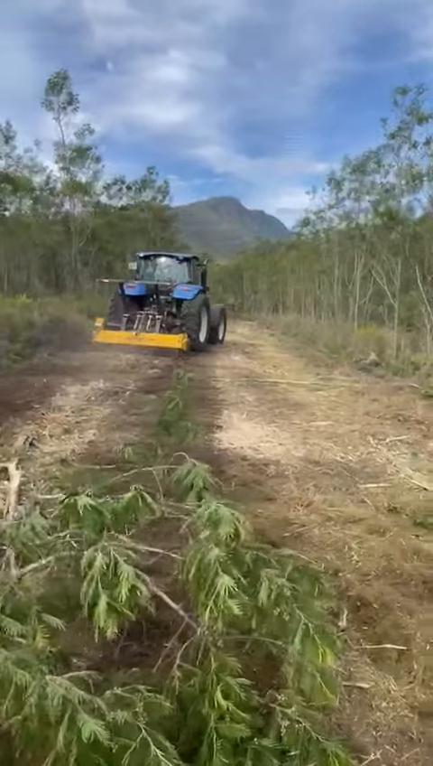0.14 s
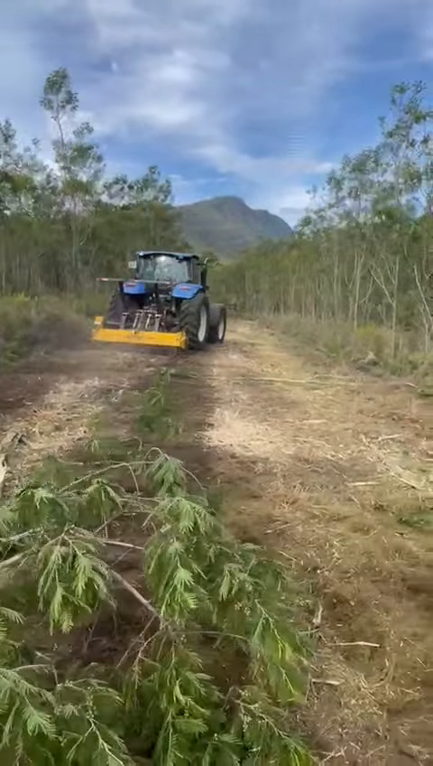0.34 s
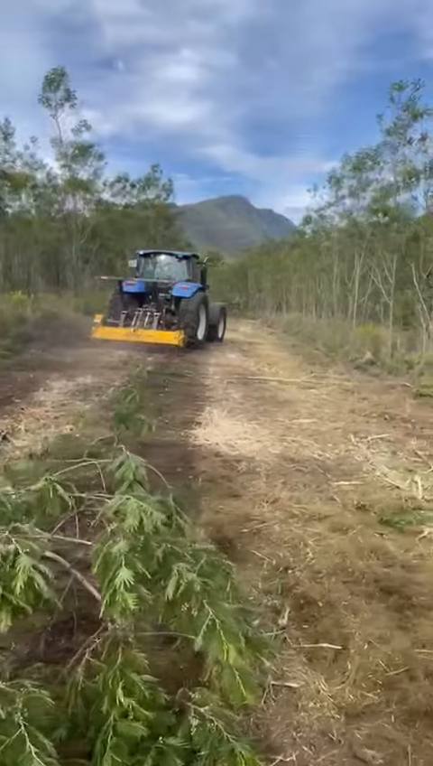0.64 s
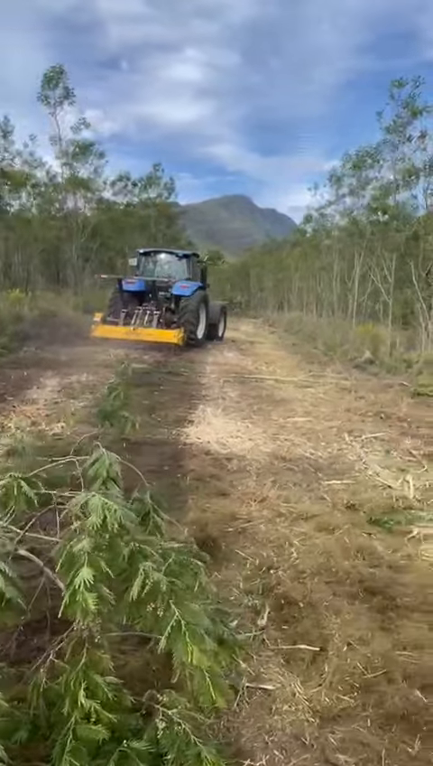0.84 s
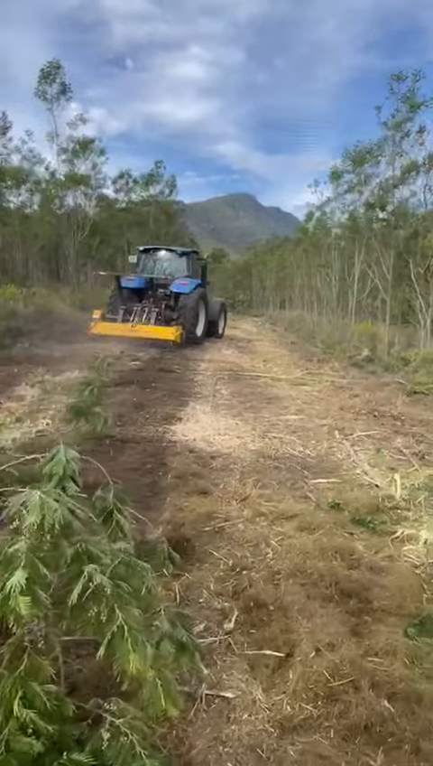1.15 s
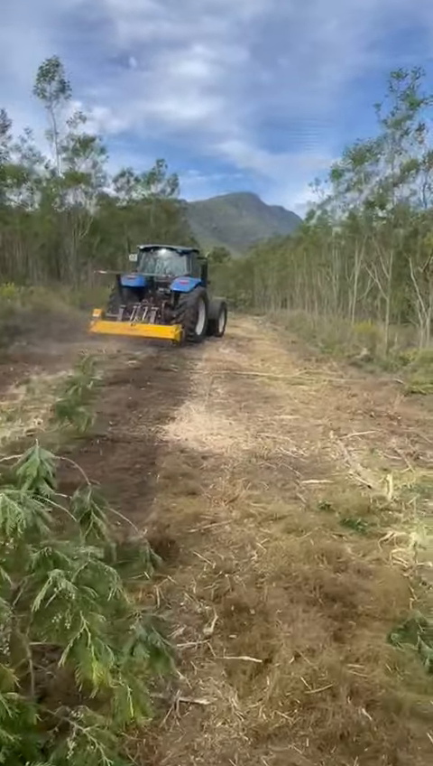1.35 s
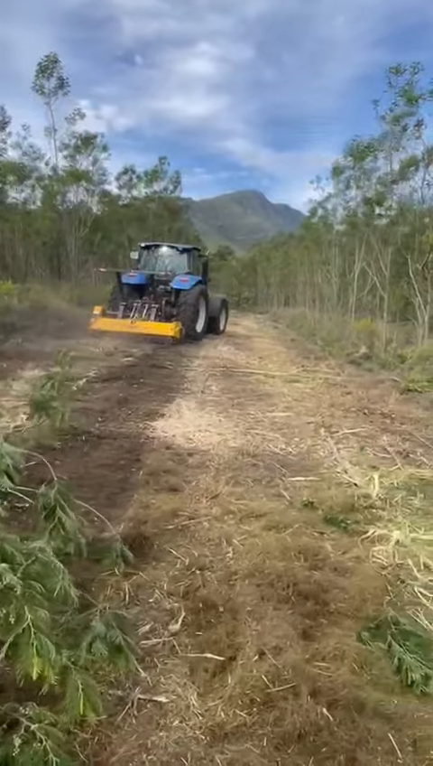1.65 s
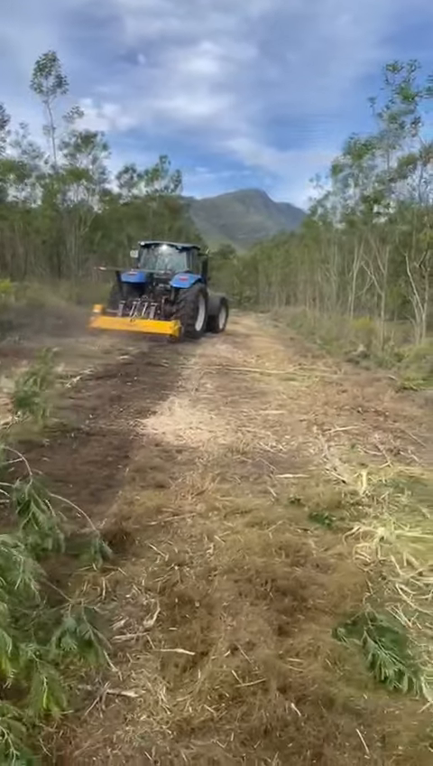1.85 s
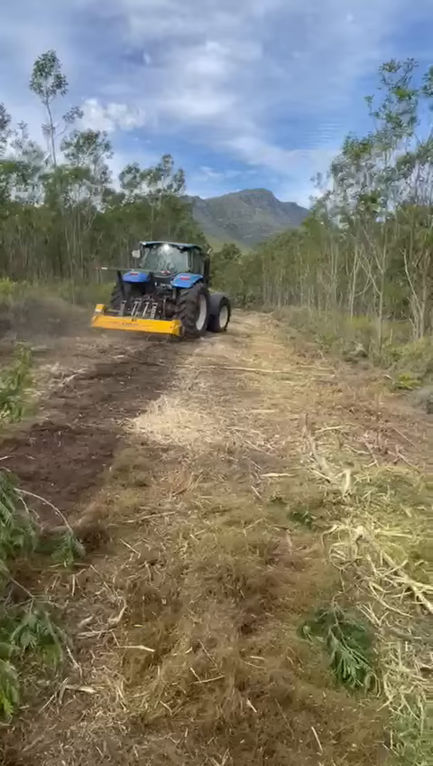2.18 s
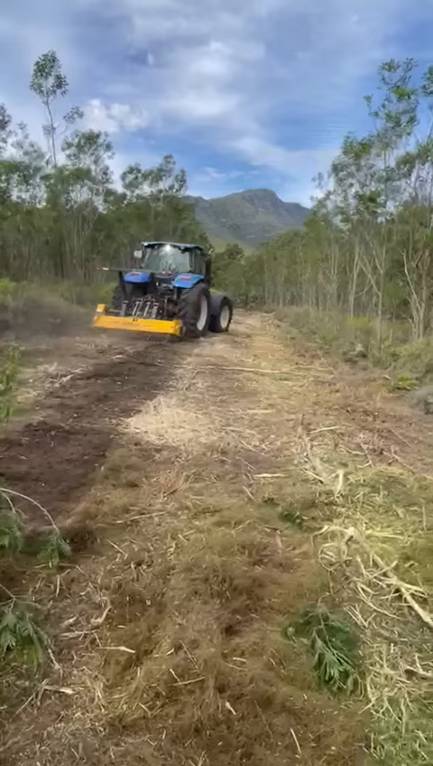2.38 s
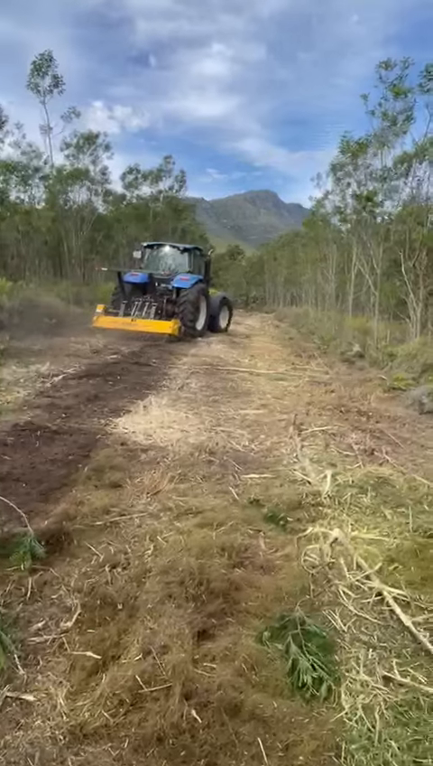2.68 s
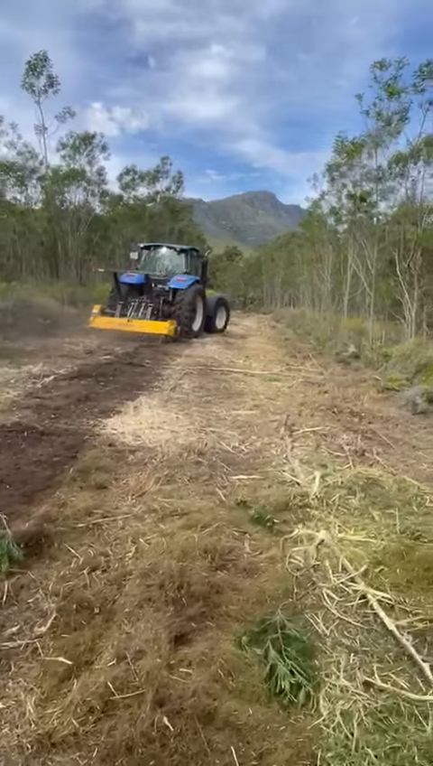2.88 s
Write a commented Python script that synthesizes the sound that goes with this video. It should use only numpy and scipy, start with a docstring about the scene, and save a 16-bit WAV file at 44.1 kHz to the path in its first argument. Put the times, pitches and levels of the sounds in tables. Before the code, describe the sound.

Steady low tractor engine roar with rumble and mechanical clatter outdoors; branches crunch in clusters, dry stalks tick close to the phone, twig shredding swells late, and steel clangs at start and near the end.

```python
"""A forest track: some way off, a six-cylinder diesel tractor drives a mulcher through cut brush.
Sines locked to the crankshaft make the exhaust drone and fan; wavering sines make the rotor and gear whine.
Filtered noise makes rumble, clatter and a swelling thin sizzle; random clicks make the shredding of twigs.
Short decaying bursts make crunching branches, snapping stalks and two hard pieces clanging on the steel hood.
A phone with closely spaced ports picks it up, with scattered noises opposite in sign at the two ports."""
import sys
import numpy as np
from scipy import signal
from scipy.fft import rfft, irfft
from scipy.io import wavfile
from scipy.ndimage import uniform_filter1d

SR = 44100
rng = np.random.default_rng(int(sys.argv[2]) if len(sys.argv) > 2 else 0)


def wav_out(sig):
    """Save sig, one row per channel (or a flat mono array), as 16-bit PCM at SR to the path in sys.argv[1]."""
    wavfile.write(sys.argv[1], SR, np.round(np.clip(np.atleast_2d(sig).T, -1, 1) * 32767).astype(np.int16))


N = 133182
T = np.arange(N) / SR
FREQS = np.maximum(np.fft.rfftfreq(2 * N, 1 / SR), 1)

# The crankshaft, sagging as the rotor takes a thick load. Each row: time in seconds,
# speed in turns per second, exhaust level in dB before the engine's common trim.
CRANKSHAFT = [(0, 34.8, -21), (.18, 34.6, -24.5), (.32, 34.77, -20), (1.4, 34.72, -19), (2.1, 34.58, -18.5),
              (2.62, 33.7, -18), (3.02, 34.9, -17.5)]
FULL_SPEED_HZ = 34.65  # crankshaft speed at which the rotor and gear frequencies hold
TWIGS_PER_S, TWIG_SPREAD_DB = 3000, 1.5
HIT_ATTACK_S = 0.0016


def undb(db):
    """The decibel is logarithmic: 20 dB is a factor of ten in amplitude."""
    return 10 ** (np.asarray(db) / 20)


def unit(x):
    """Normalise effective amplitude to rms 1."""
    return x / np.sqrt(np.mean(x ** 2))


def curve(table, axis=1):
    """Linear interpolation in time of one column of a table."""
    rows = np.array(table)
    return np.interp(T, rows[:, 0], rows[:, axis])


def across(table):
    """Interpolation on a logarithmic frequency axis, where equal ratios are equal steps."""
    rows = np.array(table)
    return np.interp(np.log(FREQS), np.log(rows[:, 0]), rows[:, 1])


def filtered(x, gain):
    """Linear filtering: the spectrum is multiplied by a frequency response."""
    return irfft(rfft(x, 2 * N) * gain)[:N]


def colour(x, table):
    """Spectral shaping by a table of relative levels, returned at rms 1."""
    return unit(filtered(x, undb(across(table))))


def resonance(hz, width_hz):
    """A damped mode responds most at its natural frequency; damping sets its bandwidth."""
    return 1 / (1 + 1j * (FREQS ** 2 - hz ** 2) / (FREQS * width_hz))


def noise():
    """White noise: independent Gaussian samples with a flat expected spectrum."""
    return rng.standard_normal(N)


def walk(rate):
    """Slow random modulation: levels held 1 / rate s, smoothed by two moving averages, rms 1."""
    k = int(SR / rate)
    held = np.repeat(rng.standard_normal(N // k + 1), k)
    return unit(uniform_filter1d(uniform_filter1d(held, k), k)[:N])


def splinters(per_s, spread_db):
    """Random impulses of breaking fibres: independent arrivals, exponentially spread dB sizes."""
    size = undb(spread_db * np.minimum(rng.exponential(size=N), 5))
    arrivals = rng.random(N) < per_s / SR
    return unit(arrivals * size * np.sign(noise()))


def burst(x, start, attack, decay, tilt_db=0):
    """Transient envelope: a linear rise, then exponential decay, on sound tilted in dB per octave."""
    first = max(int(start * SR), 0)
    part = x[first:first + 16384]
    hz = np.clip(np.fft.rfftfreq(len(part), 1 / SR), 300, None)  # the tilt levels off below 300 Hz
    tilt = undb(tilt_db * np.log2(hz / 2000))  # pivot at 2000 Hz
    part = unit(irfft(rfft(part) * tilt, len(part)))
    age = np.arange(len(part)) / SR
    shape = np.minimum(age / attack, 1) * np.exp(-np.maximum(age - attack, 0) / decay)
    return np.pad(part * shape, (first, N - first - len(part)))


def engine(turns):
    """Periodic firing gives harmonics of rotation; unequal cylinders add half orders, a belt-driven fan its own."""
    trim_db, beat_db = -2.8, -13.5
    fan_order = 6.79  # blade passes per turn of the crankshaft
    fan_db, fan_waver_db = -13.5, 1.36
    # Each row: multiple of the crankshaft rate, relative level in dB.
    orders = [(3, 0), (6, -16), (18, -28), (32, -25)]
    tones = sum(undb(db) * np.sin(2 * np.pi * (round(k) * turns + rng.random())) for k, db in orders)
    # the firing pattern repeats every two turns and so fills in the half orders
    half_orders = [k for k in np.arange(3.5, 10, .5) if k != 6]
    beat = sum(np.sin(2 * np.pi * (k * turns + rng.random())) / k for k in half_orders)
    fan = undb(fan_db + fan_waver_db * walk(13)) * np.sin(2 * np.pi * fan_order * turns)
    level = undb(trim_db + curve(CRANKSHAFT, axis=2))
    return (np.sqrt(2) * (tones + fan) + undb(beat_db) * unit(beat)) * level


def drive(turns):
    """Gear and rotor tones scale with shaft speed; random frequency and amplitude modulation makes them waver."""
    waver_db, jitter = 3, 0.00811  # jitter: rms share of each frequency
    # Each row: frequency in Hz at full speed, level in dB.
    drive_tones = [(56.9, -40.5), (113.8, -44), (170.7, -42), (685, -48.5), (1023, -46.5), (1370, -44.5),
                   (1760, -48), (2042, -49)]
    out = 0
    for hz, db in drive_tones:
        wander = jitter * np.cumsum(walk(35.32)) / SR
        cycles = hz * (turns / FULL_SPEED_HZ + wander) + rng.random()
        tone = undb(waver_db * walk(12)) * np.sin(2 * np.pi * cycles)
        out = out + undb(db) * unit(tone)
    return out


def rotor():
    """Broadband excitation rumbles with half the exhaust's dB swing; a resonance booms as the rotor bites ground."""
    rumble_db = -31.8
    bite_s, bite_length_s, bite_db = 2.42, 0.04, -21  # length: standard deviation of the swell
    bite_hz, bite_width_hz = 197.6, 71  # width of each of two cascaded resonances
    # Each row: frequency in Hz, relative spectral level in dB.
    rumble_spectrum = [(20, -24), (62, -8.5), (120, -1.5), (165, 0.5), (200, -8.5), (310, -10.5),
                       (420, -20), (900, -69)]
    load = curve(CRANKSHAFT, axis=2)
    rumble = undb(rumble_db + (load - load.mean()) / 2) * colour(noise(), rumble_spectrum)
    swell = np.exp(-((T - bite_s) / bite_length_s) ** 2 / 2)
    boom = unit(filtered(noise(), resonance(bite_hz, bite_width_hz) ** 2)) * swell
    return rumble + undb(bite_db) * boom


def sizzle():
    """Narrow-band noise: a sharp, very high resonance passes noise whose level swells and fades."""
    floor_db, sizzle_hz, width_hz = -44, 11790, 140
    # Each row: centre in seconds, Gaussian length (to 1/e) in seconds, level in dB added to the floor.
    swells = [(0.497, 0.026, -27.5), (1.284, 0.039, -29.5), (2.252, 0.17, -37.5), (2.532, 0.049, -27.5),
              (2.936, 0.21, -39)]
    swell = undb(floor_db)
    swell = swell + sum(undb(db) * np.exp(-((T - s) / length) ** 2) for s, length, db in swells)
    return swell * unit(filtered(noise(), resonance(sizzle_hz, width_hz)))


def clatter():
    """Amplitude-modulated noise: dense, restless mechanical sound of diesel and driveline."""
    # Each row: frequency in Hz, relative spectral level in dB.
    clatter_spectrum = [(250, -16), (450, -4), (650, 4), (900, -3), (1120, 4.5), (1550, -2.5), (2150, -1),
                        (3200, -4.5), (4500, -9), (7000, -10.5), (12000, -14)]
    restless = undb(1.2 * walk(70))
    return undb(-31) * colour(noise() * restless, clatter_spectrum)


def shredding(turns):
    """Periodic strikes modulate the random fracture of twigs; thicker branches add decaying crunches."""
    rotor_hz = 55.34  # at full speed
    strike_share, strike_turns = 0.32, 0.49  # weight of the strike pulses; their decay in rotor turns
    crunch_attack_s = 0.004
    # Each row: time in seconds, twig level in dB.
    feed = [(0, -58), (.6, -35.5), (1.0, -42.5), (1.45, -37.5), (2.1, -39), (2.25, -25.5), (2.45, -25),
            (2.8, -31), (3.02, -30.5)]
    # Twigs, then branches. Each row: frequency in Hz, relative spectral level in dB.
    twig_spectrum = [(300, -11), (800, 1), (2000, 3), (6300, -2.5), (9000, -10.5), (12000, -6.5)]
    wood_spectrum = [(200, -5.5), (420, -10), (800, -2.5), (2000, 3.5), (3200, 0), (6000, -7.5),
                     (12000, -18.5)]
    # Each row: start in seconds, level in dB, decay in seconds, tilt in dB per octave.
    branches = [(.003, -21.5, 0.021, -2.5), (0.42, -25, 0.013, -0.5), (.667, -25, 0.017, -6),
                (0.758, -24, 0.014, 0), (0.779, -18.5, 0.028, -5.5), (0.808, -24, 0.011, 1.5),
                (0.824, -21, 0.027, -2), (0.855, -20.5, 0.025, 10), (1.069, -22, 0.011, 3.5),
                (1.191, -26, 0.019, 3.5), (1.214, -23, 0.019, 3), (1.286, -26.5, 0.012, 2.5),
                (1.367, -27, 0.047, 0), (1.511, -23.5, 0.023, 0), (1.897, -24, 0.036, 6),
                (2.227, -19, 0.018, 12), (2.366, -21.5, 0.027, -2), (2.859, -26, 0.029, -3.5),
                (2.991, -27, 0.026, 1.5)]
    phase = rotor_hz * turns / FULL_SPEED_HZ % 1
    strikes = 1 - strike_share + strike_share * unit(np.exp(-phase / strike_turns))
    twigs = colour(strikes * (splinters(TWIGS_PER_S, TWIG_SPREAD_DB) + .5 * noise()), twig_spectrum)
    wood = colour(strikes * (splinters(TWIGS_PER_S, TWIG_SPREAD_DB) + noise()), wood_spectrum)
    crunches = sum(undb(db) * burst(wood, s, crunch_attack_s, decay, tilt)
                   for s, db, decay, tilt in branches)
    return twigs * undb(curve(feed)) + crunches


def clangs():
    """Modal excitation: where a hard piece strikes the hood decides how strongly each mode sounds."""
    mode_width_hz, crack_db = 70, -6  # crack level relative to the modes
    # Each row: start in seconds, level in dB, decay in seconds, tilt in dB per octave.
    pieces = [(.002, -10.5, 0.02, 0.5), (2.7181, -10.5, 0.016, 0.5)]
    # Modes. Each row: frequency in Hz, relative level in dB at the first spot struck, and at the second.
    modes = [(747, -5, -17), (1203, -0.5, -9.5), (2037, 2, -4), (2280, -0.5, 1), (2610, -7, -1.5),
             (2816, -5.5, -2), (3450, -2, -15), (4233, -16, -16)]
    # Each row: frequency in Hz, relative spectral level in dB.
    crack_spectrum = [(1400, -24), (2300, 11.5), (3400, 2.5), (4300, -9), (12000, -13)]
    out = 0
    for spot, (s, db, decay, tilt) in enumerate(pieces):
        hood = sum(undb(levels[spot]) * resonance(hz, mode_width_hz) for hz, *levels in modes)
        steel = unit(filtered(noise(), hood)) + undb(crack_db) * colour(noise(), crack_spectrum)
        out = out + undb(db) * burst(steel, s, HIT_ATTACK_S, decay, tilt)
    return out


def snaps():
    """Brittle fracture: dry stalks near the phone give brief broadband ticks."""
    decay_s = 0.0039
    # Each row: start in seconds, level in dB.
    stalks = [(0.39, -23), (.462, -21.5), (0.504, -24.5), (1.762, -20.5)]
    # Each row: frequency in Hz, relative spectral level in dB.
    snap_spectrum = [(1000, -12), (3400, 8.5), (12000, 0.5)]
    stalk = colour(noise(), snap_spectrum)
    return sum(undb(db) * burst(stalk, s, HIT_ATTACK_S, decay_s) for s, db in stalks)


def noises(turns):
    """Superposition of everything that rattles and cracks."""
    return clatter() + shredding(turns) + clangs() + snaps()


def scene():
    """Sound from ahead is equal in both channels; scatter by ground and trees is opposite in sign."""
    # Scattered noises. Each row: frequency in Hz, gain in dB.
    scatter = [(100, -57), (500, -32), (1700, -22), (2550, -8), (3100, -6.5), (4300, -16), (4850, -51.5),
               (5500, -20), (6300, -21), (7300, -4), (8000, -36.5), (9950, -45), (10700, -4.5), (11900, -6)]
    turns = np.cumsum(curve(CRANKSHAFT)) / SR
    direct = engine(turns) + drive(turns) + rotor() + sizzle() + noises(turns)
    # a second random draw with the same event times, unrelated in waveform to the direct noises
    side = filtered(noises(turns), undb(across(scatter)))
    return np.array([direct + side, direct - side])


def record(dry):
    """Two-port reception: phase and level differ with frequency; a microphone response and low-pass follow."""
    # Microphone colour. Each row: frequency in Hz, gain in dB.
    mic_response = [(3500, 0), (4650, 3), (5100, -3.5), (6200, 1), (7200, -0.5), (8000, -6), (10000, 5),
                    (11000, 5.5), (12000, -1.5)]
    # Each row: frequency in Hz, lead of the left port in turns.
    port_phase = [(1950, 0), (2420, .2), (2720, -.07), (3620, .05), (4200, .16), (4740, .5), (5020, .5),
                  (5280, 1), (6800, 1), (7400, 1.42), (7900, 1.5), (10050, 1.5), (10500, 1.66), (11750, 2)]
    # Each row: frequency in Hz, left minus right level in dB.
    port_balance = [(200, 0), (1170, 2.7), (2000, 3.2), (2550, 8), (3100, -.8), (4200, -2), (4800, 0)]
    # each port takes half the phase lead and half the level difference
    ports = np.exp(1j * np.pi * across(port_phase)) * undb(across(port_balance) / 2)
    mic = undb(across(mic_response))
    out = np.array([filtered(dry[0], mic * ports), filtered(dry[1], mic / ports)])
    low_pass = signal.ellip(12, .2, 90, 12050, fs=SR, output="sos")  # passband edge in Hz
    return signal.sosfilt(low_pass, out)


dry = scene()
out = record(dry)
wav_out(out)
```